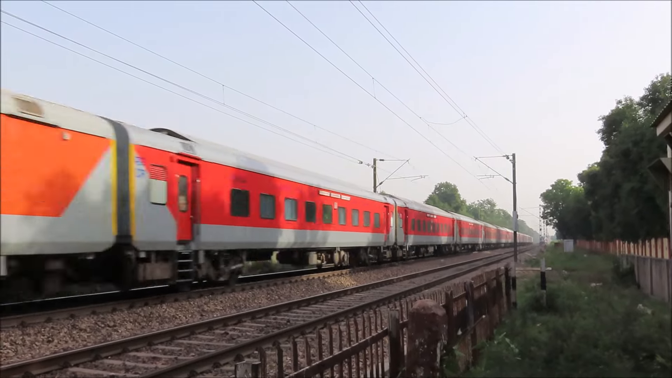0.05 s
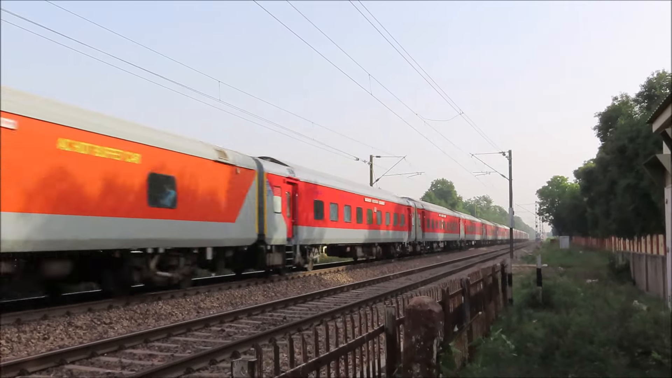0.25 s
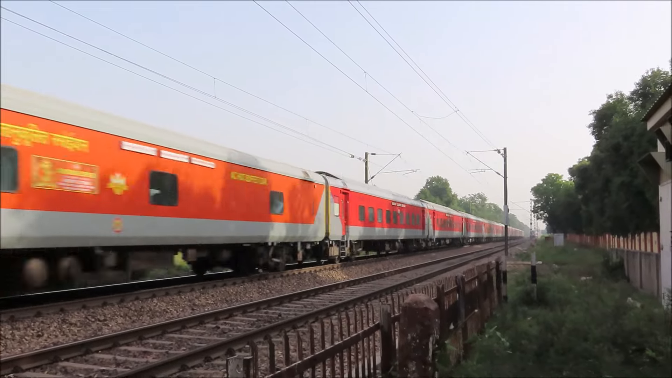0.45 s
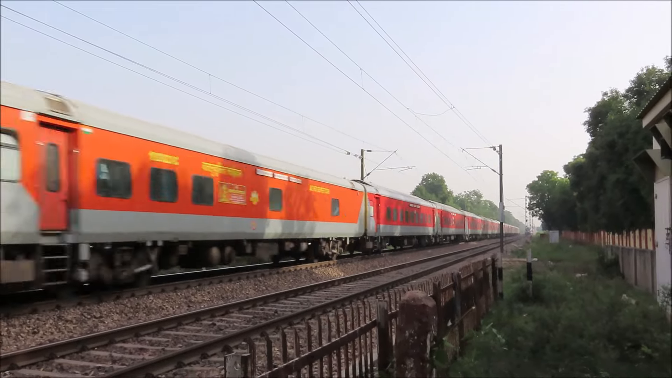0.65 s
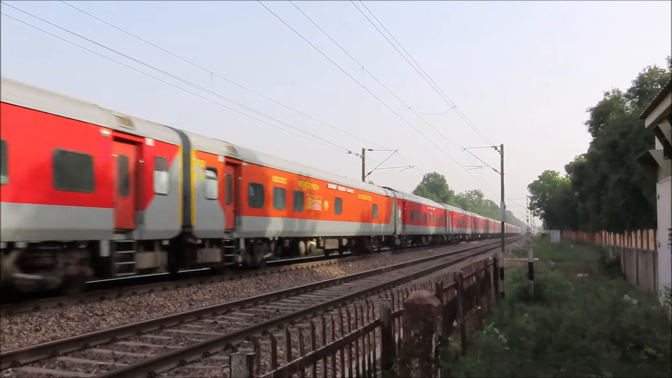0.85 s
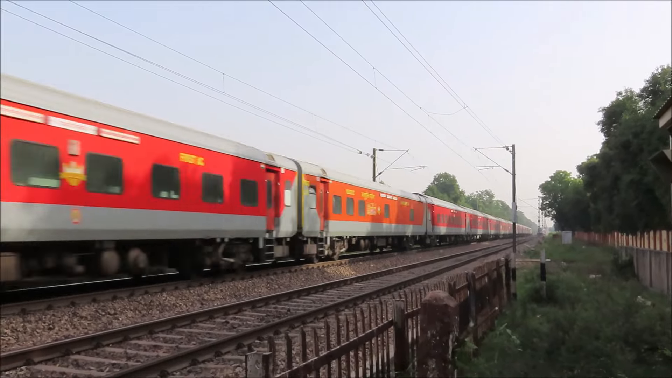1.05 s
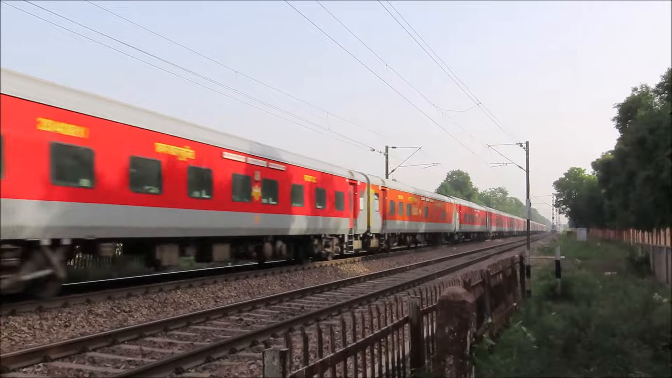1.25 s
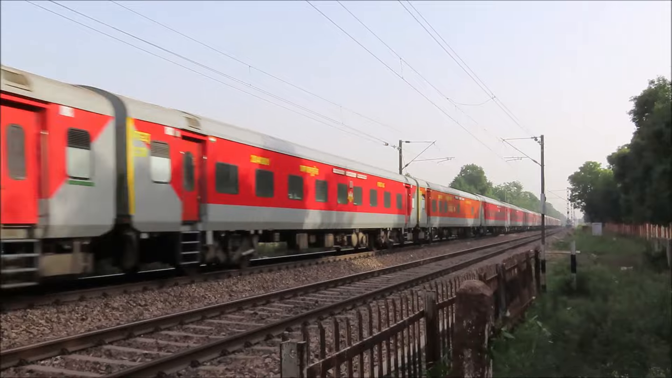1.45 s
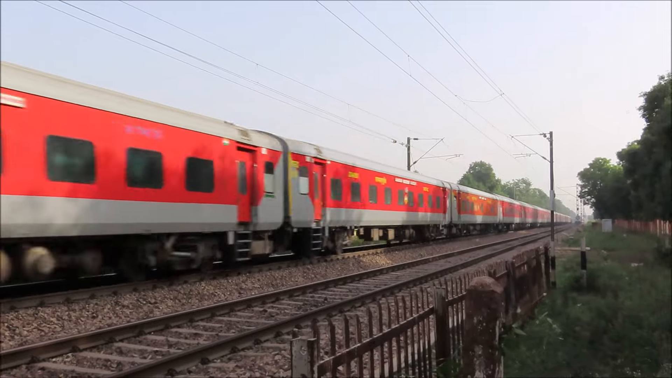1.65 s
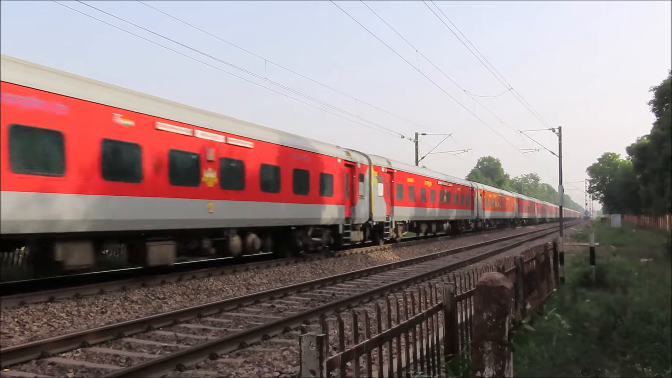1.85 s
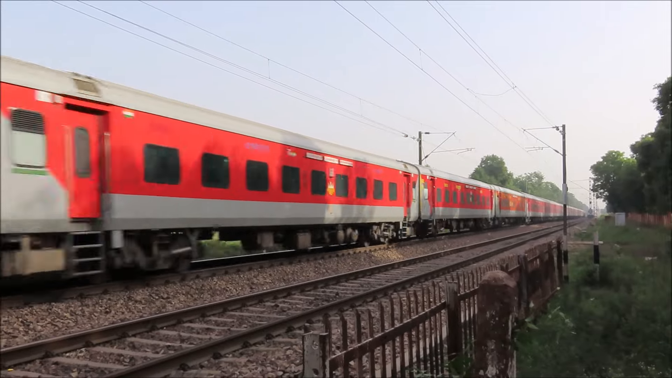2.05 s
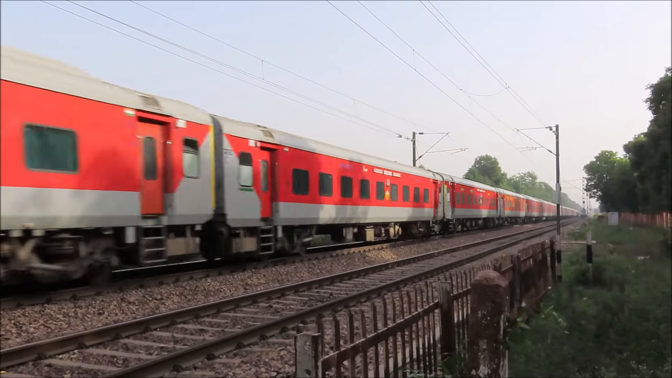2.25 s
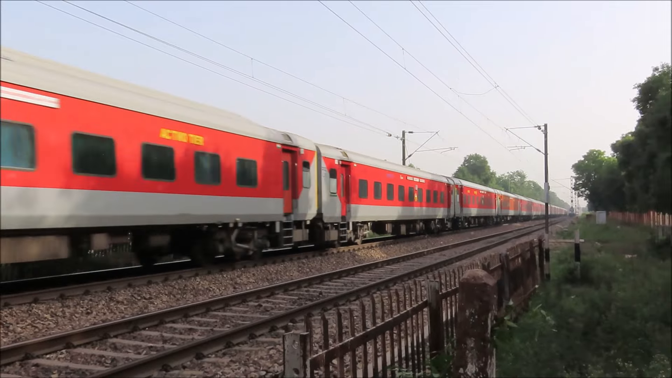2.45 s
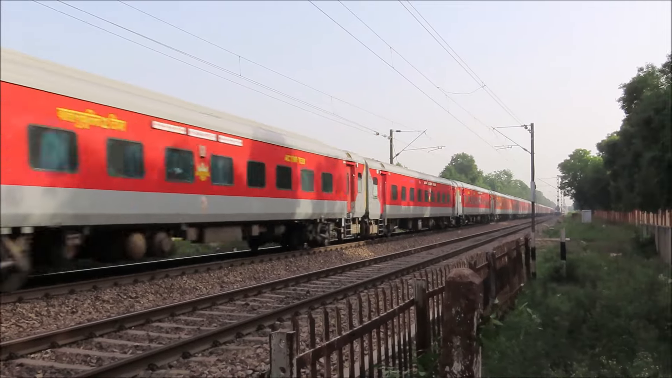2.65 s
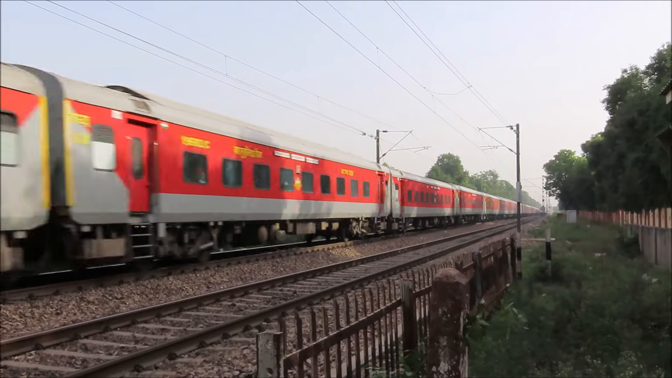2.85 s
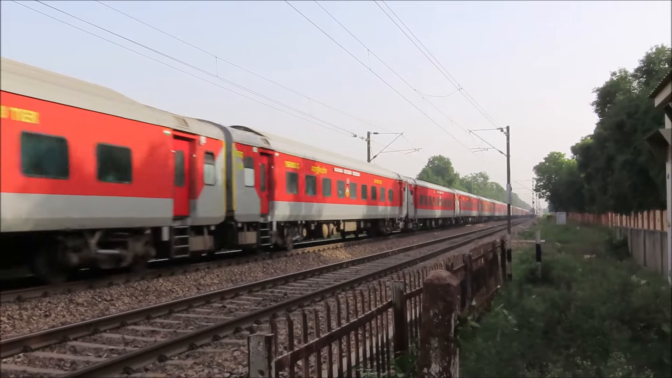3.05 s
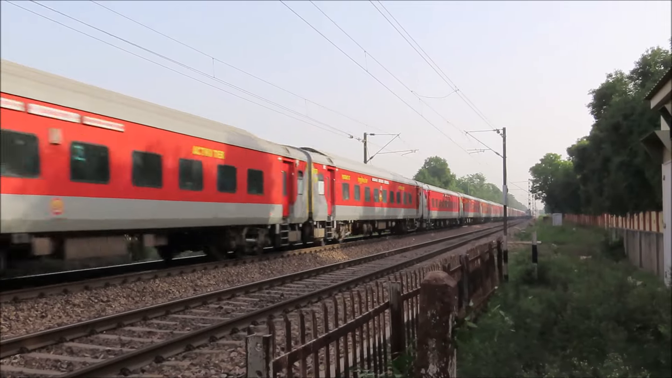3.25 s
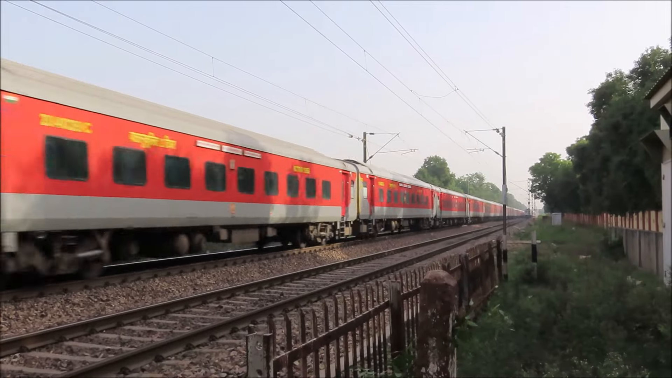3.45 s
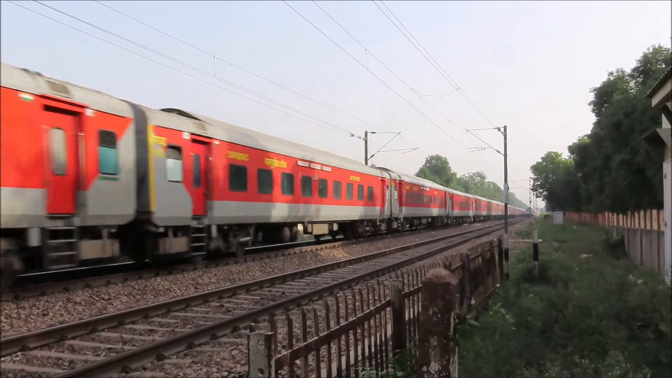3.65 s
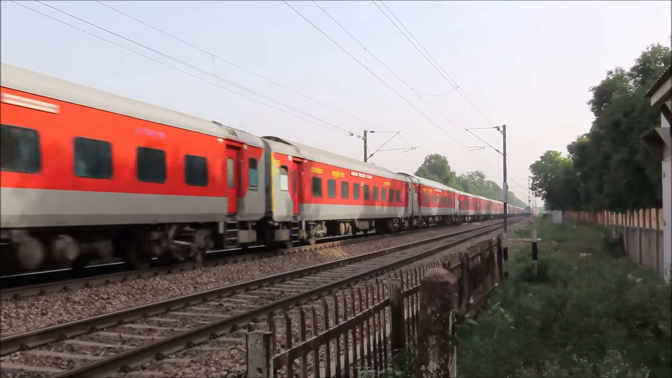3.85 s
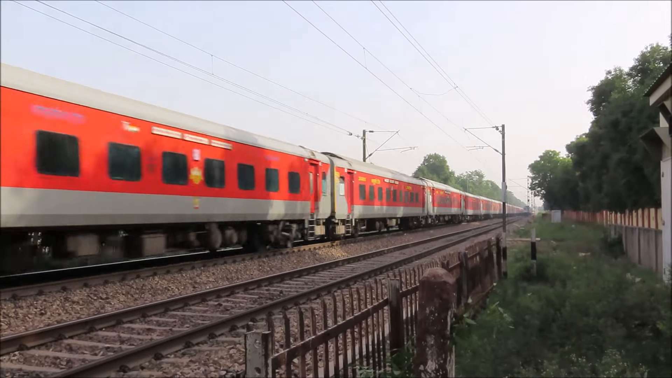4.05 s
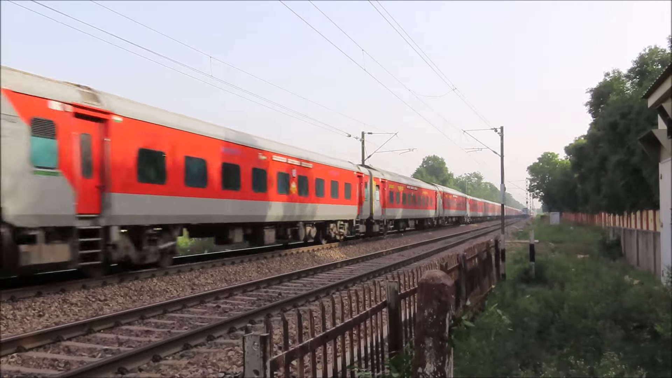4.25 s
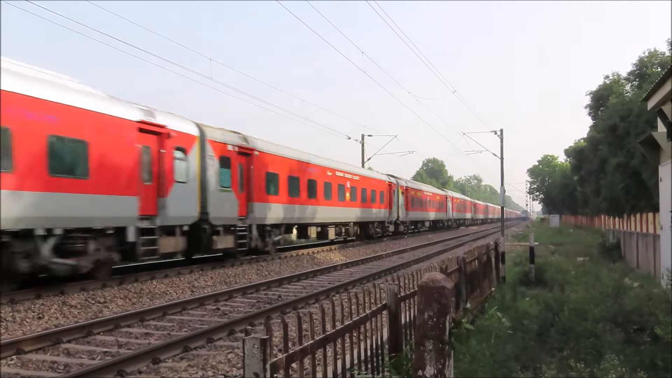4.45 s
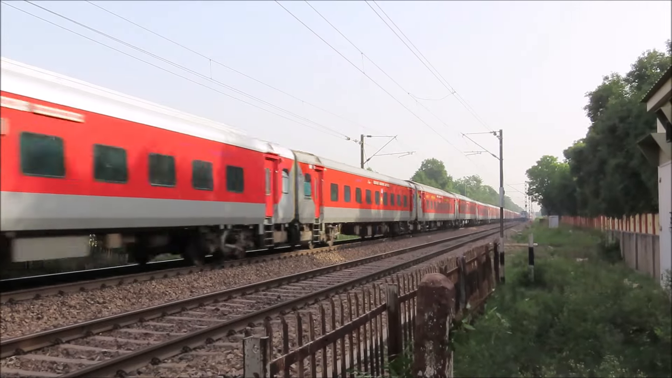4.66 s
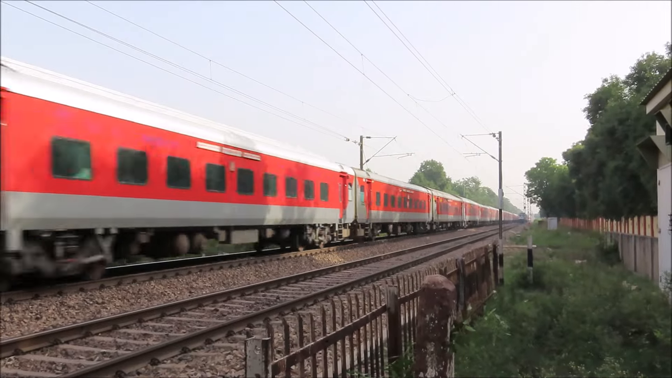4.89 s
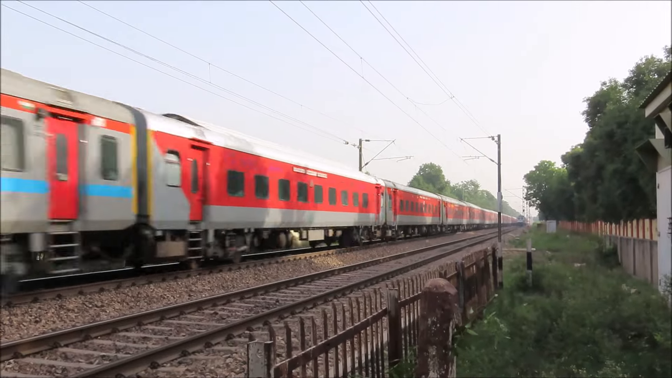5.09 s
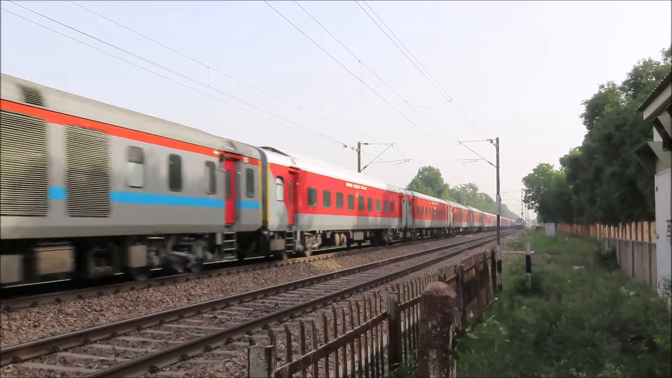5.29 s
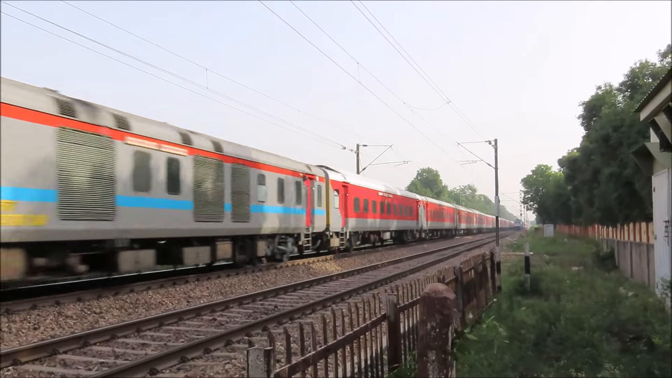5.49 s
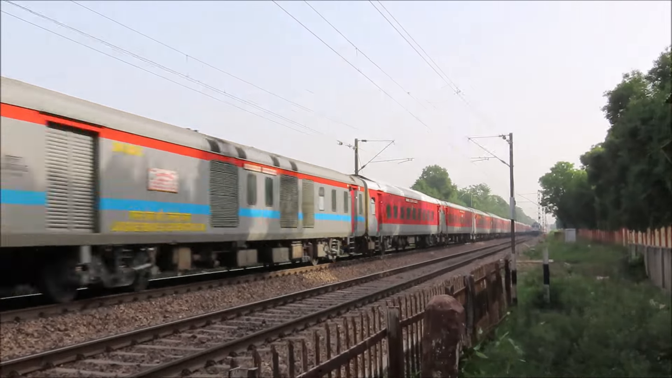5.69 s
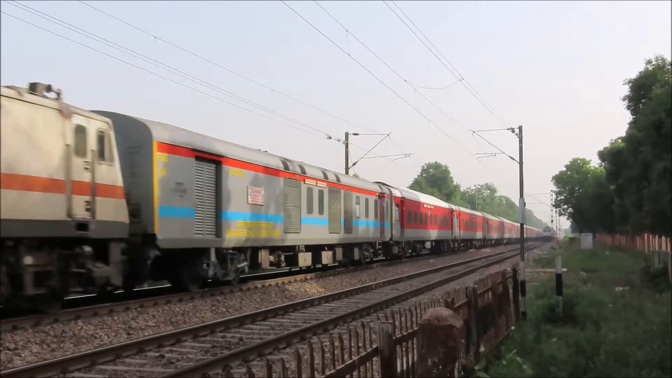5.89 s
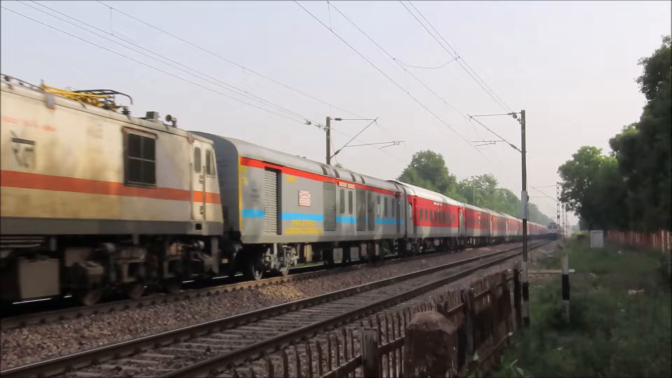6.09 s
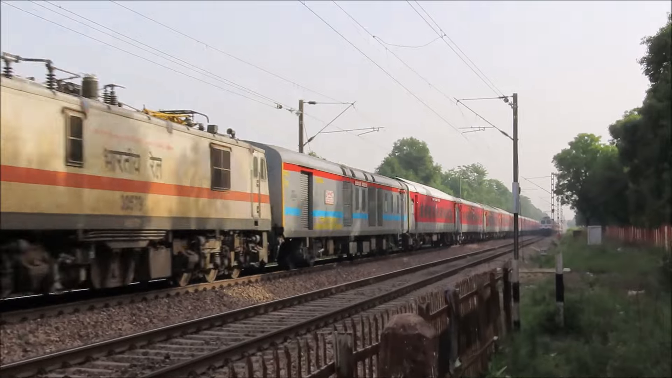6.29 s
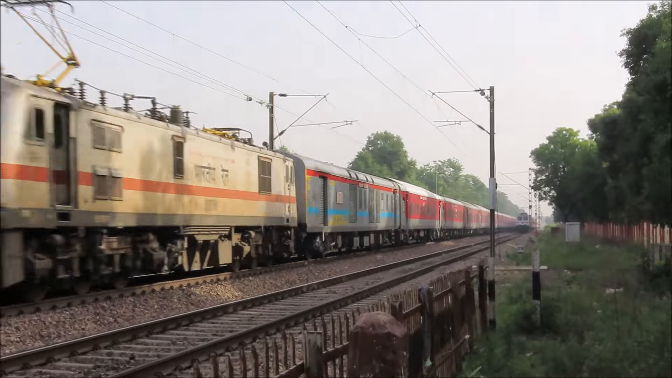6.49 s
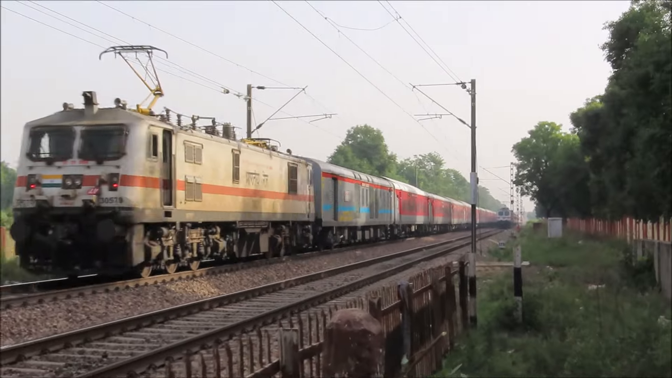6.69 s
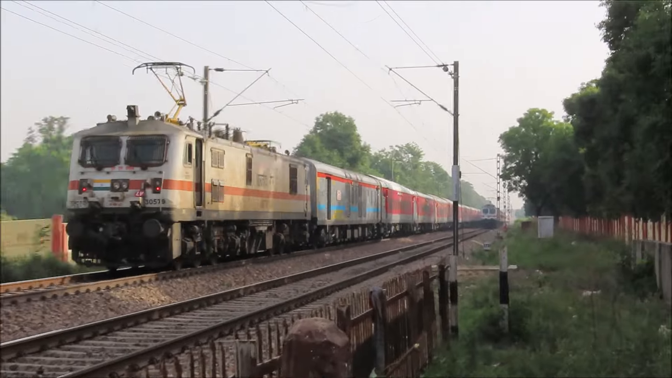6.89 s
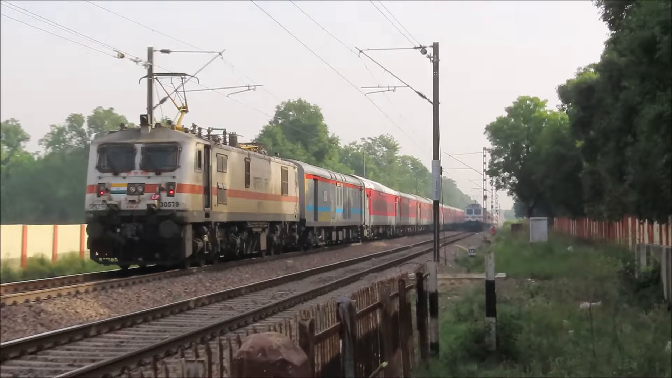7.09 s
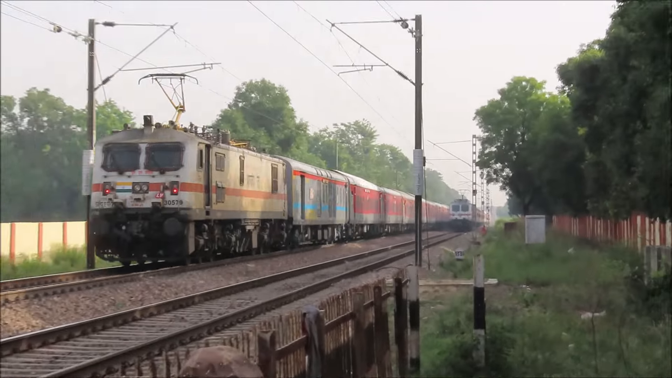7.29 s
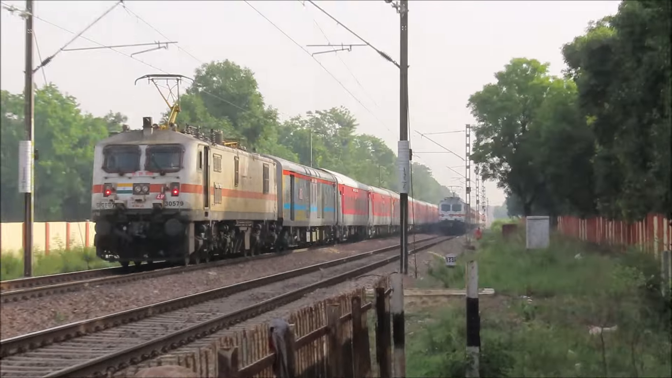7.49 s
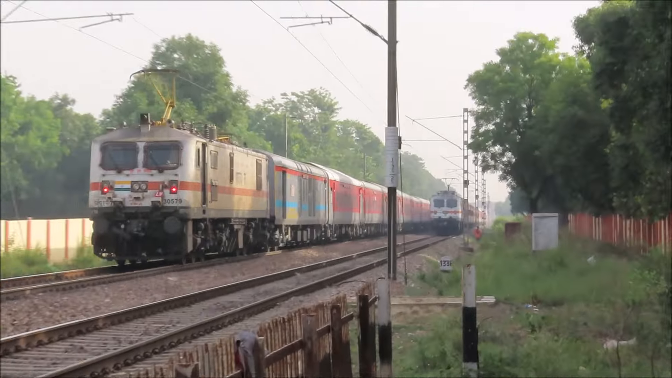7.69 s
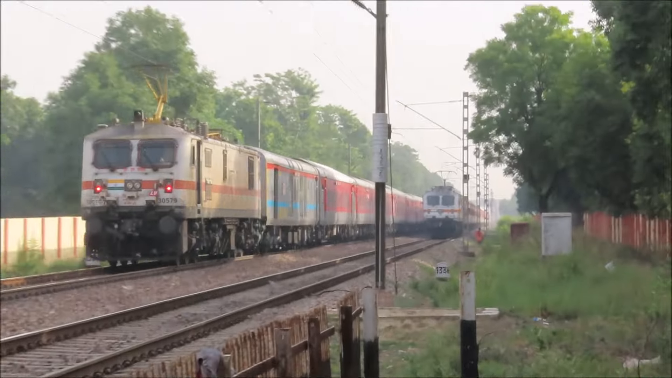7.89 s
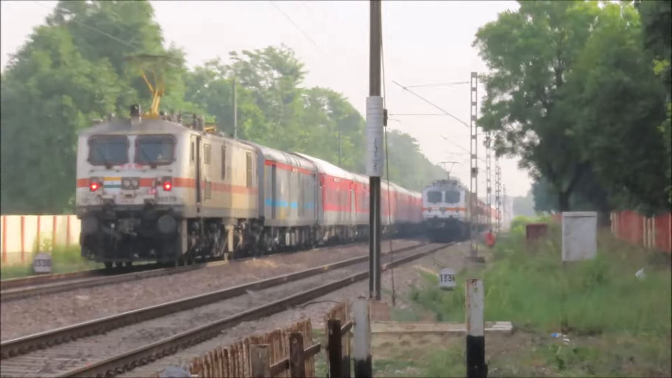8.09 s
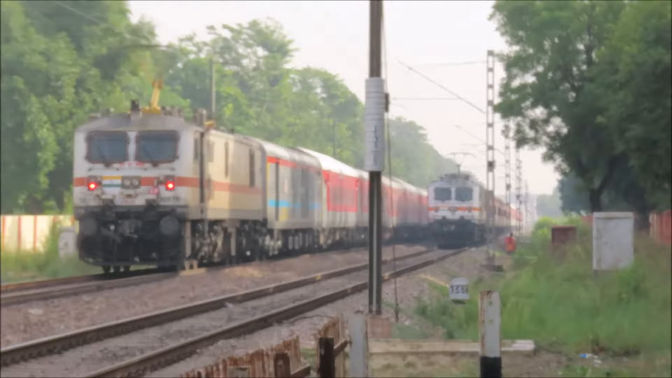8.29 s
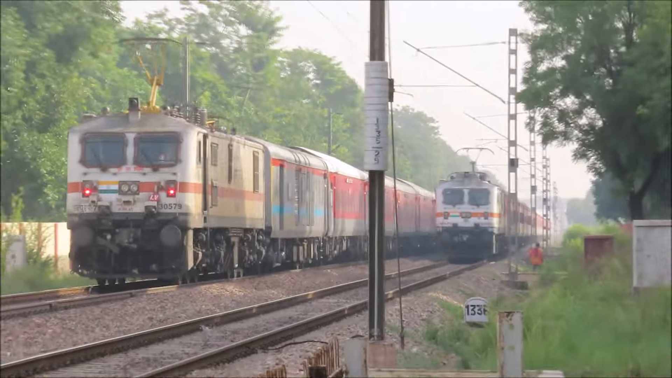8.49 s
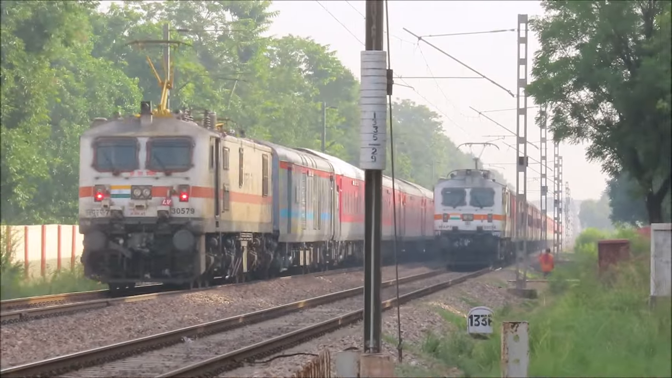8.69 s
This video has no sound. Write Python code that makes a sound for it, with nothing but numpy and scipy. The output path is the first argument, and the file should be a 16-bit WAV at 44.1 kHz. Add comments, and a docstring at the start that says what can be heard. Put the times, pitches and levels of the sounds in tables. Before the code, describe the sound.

From 0 s, coaches are already rushing past close on the left of a stereo microphone pair in the open beside the track. A broad rumble and rail hum swell with each bogie, roughly every 0.3 to 0.5 s, strongest around 0.0-0.7 s, with ringing wheel tones, rough clattering surges and brief wavering pitches. The passing continues through about 5.3 s, when the colour shifts slightly darker as the locomotive at the end arrives. Around 5.7-6.0 s it passes with a bright burst of hissing air and a faint, extremely high whine sliding down. From 6.1 to 6.7 s the roar falls away. Then thinner distant rails keep singing and fluttering in uneven bursts, while tiny dry ticks and faint bright rustle occur near the microphones, mainly 6.3-8.0 s. The distant rumble rises gradually until the end at about 8.7 s as another train nears.

```python
"""Beside the track, a microphone pair hears coaches rush past on the left: sleepers and bodies rumble and rails
hum as filtered noise swelling with each bogie, while wheels ring as resonant modes; the roar peaks briefly at
single pitches, as wavering tones. A trailing electric locomotive then hisses and whines abeam, as coloured
noise and a falling sine. As it leaves, small ticks and a faint rustle of bright noise sound close to the
microphones; the rails go on singing from afar, and the distant level climbs as the next train nears."""
import sys
import numpy as np
from scipy import signal
from scipy.fft import rfft, irfft, next_fast_len
from scipy.io import wavfile
from scipy.ndimage import uniform_filter1d

SR = 44100
rng = np.random.default_rng(int(sys.argv[2]) if len(sys.argv) > 2 else 0)


def nominal_scale(level):
    """Amplitude ratio for a level in decibels (scalar or array-like)."""
    x = np.asarray(level, float) / 20
    return 10 ** x


def store_wav(level_fs):
    """Save 16-bit WAV to argv[1]."""
    pcm = np.round(np.clip(np.atleast_2d(level_fs), -1, 1) * 32767)
    wavfile.write(sys.argv[1], SR, pcm.T.astype(np.int16))


N = 385434
T = np.arange(N) / SR
SIZE = next_fast_len(N + 8192)
HZ = np.fft.rfftfreq(SIZE, 1 / SR) + 1  # 1 Hz up, so that the log axis has no zero


def over_hz(table, column=1):
    """A table column read at every frequency, on a log axis."""
    rows = np.array(table, float)
    return np.interp(np.log(HZ), np.log(rows[:, 0]), rows[:, column])


def over_time(table):
    """The columns of a curve read at every sample."""
    s, *columns = np.transpose(table)
    return [np.interp(T, s, column) for column in columns]


def shape(x, gain):
    """Filter by a gain per frequency, with mirrored ends."""
    pad = 4096
    padded = np.pad(x, (pad, SIZE - N - pad), "reflect")
    return irfft(rfft(padded) * gain, SIZE)[pad:pad + N]


def unit(x):
    """Scaled to rms 1."""
    return x / np.sqrt(np.mean(x ** 2))


def coloured(table):
    """White noise filtered to a colour and scaled to rms 1."""
    return unit(shape(rng.standard_normal(N), nominal_scale(over_hz(table))))


def walk(rate):
    """Random levels held 1 / rate s and slewed twice; spread near 1."""
    k = int(SR / rate)
    held = np.repeat(rng.standard_normal(N // 200), k)
    return 1.3 * uniform_filter1d(uniform_filter1d(held, k), k)[:N]


# Each bogie as it draws abreast, by what it shakes.
# Each row: time in seconds, then ground, sleepers, rail and wheels levels in dB.
BOGIE_PASSES = [(.05, -37, -18.5, -23, -24.5), (.41, -34, -19.5, -22, -25), (.68, -37, -23, -25.5, -28.5),
                (1.15, -45, -25, -25.5, -27.5), (1.38, -43, -22.5, -28.5, -31),
                (1.8, -40, -27, -22.5, -29.5), (2.07, -40, -23, -23.5, -31.5),
                (2.5, -40, -20.5, -24, -31.5), (2.85, -41, -20, -22, -27), (3.29, -39, -26, -24.5, -26),
                (3.54, -35, -23.5, -29, -30.5), (3.97, -42, -25.5, -26.5, -29), (4.27, -39, -25, -26, -30),
                (4.72, -37, -22.5, -24, -28.5), (5.0, -33, -26.5, -28, -29.5),
                (5.37, -34, -19.5, -25.5, -34), (5.7, -30, -19, -26, -32), (6.1, -31, -38, -27, -32)]
# The next four lists run over the parts of the rolling noise: ground, sleepers, rail, wheels, air.
# Time from abreast at which a bogie's power is down to a quarter, in seconds.
BOGIE_REACH_S = [0.19, 0.32, 0.18, 0.16, 0.23]
# Steady part while the train is alongside, in dB.
ALONGSIDE_DB = [-41, -26, -28.5, -31.5, -39]
# Distant level until the first train has cleared, in dB, and at the end, as the next one nears, in dB.
AFAR_CLEARED_DB = [-38, -29.5, -34.5, -41, -46.5]
AFAR_ONCOMING_DB = [-33.5, -29, -33, -34.5, -44.5]


def loudness():
    """Level of each part: powers add as bogies swell and pass, one train leaves and another nears."""
    clears_s, clearing_s = 6.7, 0.6  # time at which the train has cleared, and how long that takes
    air_db = -9.5  # rush of air re the mean of rail and wheels
    s, ground, sleepers, rail, wheels = np.transpose(BOGIE_PASSES)
    peaks = [ground, sleepers, rail, wheels, (rail + wheels) / 2 + air_db]
    alongside = np.clip((clears_s - T) / clearing_s, 0, 1) ** 4
    levels = []
    for peak_db, reach, body_db, cleared_db, oncoming_db in zip(
            peaks, BOGIE_REACH_S, ALONGSIDE_DB, AFAR_CLEARED_DB, AFAR_ONCOMING_DB):
        bogies = sum(nominal_scale(2 * db) / (1 + ((T - at) / reach) ** 2) ** 2 for at, db in zip(s, peak_db))
        afar_db = np.interp(T, [clears_s, T[-1]], [cleared_db, oncoming_db])
        levels.append(np.sqrt(bogies + alongside * nominal_scale(2 * body_db) + nominal_scale(2 * afar_db)))
    return levels


# Rough spots on the rail, where the clatter surges with sharp edges, and smooth ones where it lulls.
# Each row: start in seconds, end in seconds, then changes of the rail in dB, of the wheels in dB, and
# of the ringing modes in dB on top of the wheels.
ROUGH_SPOTS = [(0.35, 0.464, 0, 0, -1), (0.61, 0.743, 0, 2.5, -1), (1.712, 1.92, -0.7, -0.5, 3.5),
               (2.127, 2.172, -1, 4.5, 4), (2.252, 2.417, -2, -1.5, 1), (2.436, 2.508, 2.5, 1, 5),
               (3.2, 3.36, 1, -0.5, 0.5), (3.68, 3.825, -0.5, -1.5, 2.5), (4.364, 4.45, -.6, 1, 0),
               (5.338, 5.43, -0.5, 2.2, -4), (6.174, 6.254, -2, 0, 4), (6.49, 6.68, 2, 2, 0),
               (7.02, 7.093, 1.5, 2, 4), (7.193, 7.4, 3, 1.5, -5), (7.508, 7.602, 5.5, 0, 3.5),
               (7.6, 7.746, 4.5, 2.5, -9), (8.015, 8.077, 5.5, -0.5, -2)]


def surges():
    """Changes in dB of rail, wheels and modes over time; rough and smooth spots act at once."""
    changes = []
    for column in (2, 3, 4):
        steps = sum(1. * row[column] * ((T > row[0]) & (T < row[1])) for row in ROUGH_SPOTS)
        changes.append(uniform_filter1d(steps, size=260))  # edges of about 6 ms
    return changes


# Borders between the ranges of ground, sleepers, rail, wheels and air, in Hz.
RANGE_BORDERS_HZ = [95, 420, 1250, 2700]


def rolling(colour, levels):
    """Roughness of wheel and rail shakes each part of the track in its own range."""
    noise = rfft(rng.standard_normal(SIZE)) * nominal_scale(over_hz(colour))
    below = [0] + [1 / (1 + (HZ / f) ** 8) for f in RANGE_BORDERS_HZ] + [1]
    parts = [irfft(noise * (hi - lo), SIZE)[:N] for lo, hi in zip(below, below[1:])]
    return sum(unit(part) * level for part, level in zip(parts, levels))


def singing(modes, patchy_db):
    """Lightly damped modes shaken by one roughness; the strength of each wanders by itself."""
    song, roughness = 0, rng.standard_normal(N)
    for hz, width, db in modes:
        peak = signal.iirpeak(hz, hz / width, SR)
        mode = signal.lfilter(*peak, signal.lfilter(*peak, roughness))
        song = song + nominal_scale(db + patchy_db * walk(16)) * unit(mode)
    return song


# The roar peaks briefly at one pitch.
# Each row: centre in seconds, pitch in Hz, level in dB before the wavering, spread in seconds.
BRIEF_PEAKS = [(0.03, 2140, -20, 0.03), (0.4, 178.4, -10, 0.021), (0.42, 2150, -20, 0.042),
               (0.42, 3600, -31, 0.044), (0.68, 175, -16, 0.045), (0.699, 1480, -22.5, 0.035),
               (0.67, 2090, -27, 0.045), (0.705, 3230, -28, 0.036), (0.7, 3540, -36, 0.03),
               (1.19, 870, -16.5, 0.04), (1.652, 172, -21, 0.045), (1.74, 1870, -26, 0.022),
               (1.79, 2350, -26.5, 0.028), (1.81, 2810, -29, 0.012), (1.88, 3330, -35, 0.025),
               (1.92, 1015, -18, 0.028), (2.11, 938, -18.5, 0.024), (2.14, 2160, -20, 0.023),
               (2.161, 1746, -22, 0.045), (2.158, 4360, -33, 0.014), (2.161, 2980, -33, 0.015),
               (2.161, 5470, -46, 0.02), (2.72, 71, -30, 0.05), (2.89, 2080, -24, 0.029),
               (3.218, 84.5, -23, 0.04), (3.248, 387, -28, 0.063), (3.36, 2120, -25, 0.035),
               (3.958, 2680, -25, 0.02), (4.27, 2560, -36, 0.016), (5.712, 284, -17, 0.035),
               (5.85, 48, -24, 0.074), (5.86, 240.6, -16.5, 0.046), (6.129, 240.3, -21.5, 0.087),
               (6.409, 343, -26.5, 0.04), (6.421, 89, -27, 0.034), (6.94, 111.6, -27.5, 0.065),
               (7.25, 108, -29, 0.054), (7.28, 667, -32, 0.05), (7.4, 98.9, -29, 0.055),
               (7.61, 623, -22, 0.021), (7.631, 80, -21, 0.03), (7.71, 660, -26, 0.019),
               (7.99, 88, -25, 0.026), (8.04, 958, -31, 0.046), (8.182, 1658, -35, 0.023),
               (8.39, 87, -21.5, 0.024), (8.57, 2120, -33, 0.027)]


def roar_peaks():
    """Each peak swells and fades, wavering in pitch and strength like narrow noise."""
    wobble = 0.045  # sets the wavering rate, in proportion to the pitch
    out = np.zeros(N)
    t = np.arange(-9000, 9000) / SR
    for s, hz, db, spread in BRIEF_PEAKS:
        k = int(SR / hz / wobble / 2)
        a, b = (unit(uniform_filter1d(uniform_filter1d(rng.standard_normal(len(t)), k), k))
                for _ in range(2))
        tone = np.real((0.6 + 0.5 * (a + 1j * b)) * np.exp(2j * np.pi * hz * t))
        swell = nominal_scale(db) * np.exp(-0.5 * (t / spread) ** 2)
        at = int(s * SR) + np.arange(len(t)) - len(t) // 2
        inside = (at >= 0) & (at < N)
        out[at[inside]] += (swell * tone)[inside]
    return out


# How the side follows the mid for a source on the left of the pair.
# Each row: frequency in Hz, share 0-1 for a source alongside, phase lead in radians.
LEFT_AIM = [(100, 0, 0.24), (600, 0.8, 0.084), (1300, 0.7, 0.25), (2500, 0.57, 1), (4900, .5, 1.22),
            (10000, 0.3, 1.4)]


def side_signal(direct, along, wide, aim):
    """Part of the side is the mid itself, led in phase; the rest comes from along the train."""
    alike = np.clip(aim * over_hz(LEFT_AIM), 0, 1)
    lead = np.exp(1j * over_hz(LEFT_AIM, column=2))
    gain = nominal_scale(over_hz(wide))
    return shape(direct, gain * np.sqrt(alike) * lead) + shape(along, gain * np.sqrt(1 - alike))


# Shares of coach and locomotive colour; some coach colour stays under the distant rails.
# Each row: time in seconds, coach colour share 0-1, locomotive colour share 0-1; far colour fills the rest.
COLOUR_SHARES = [(0, 0.93, 0), (5.2, 1, 0), (5.45, 0.26, 0.73), (6.1, 0, 0.84), (6.25, 0.02, 0.48),
                 (6.45, 0.35, 0)]
# Rolling colour of the coaches, of the locomotive and from afar; each range is scaled to its own level.
# Each row: frequency in Hz, relative density in dB per Hz.
COACH_COLOUR = [(15, -52), (25, -35), (43, -22), (91, -14), (169, 1), (231, -2), (306, -9.5), (440, -11),
                (569, -12), (906, -6), (1340, -15), (1480, -12), (2130, -17), (8360, -55), (12000, -87.5),
                (15600, -101), (22000, -120)]
ENGINE_COLOUR = [(15, -51), (25, -29), (38, -27), (115, -7), (231, -3.5), (323, -12), (463, -11),
                 (541, -14.5), (631, -7), (930, -8), (1240, -13.5), (2130, -19.5), (3850, -33), (7740, -53),
                 (12000, -82), (15600, -102), (22000, -120)]
FAR_COLOUR = [(15, -31), (25, -12), (92, -2), (130, -9), (214, -11), (300, -21.5), (456, -18), (641, -10.5),
              (760, -19), (1480, -19.5), (2200, -24), (2350, -29.5), (3250, -34.5), (9250, -57),
              (13000, -69)]
# Side over mid of the finished sound, alongside and from afar.
# Each row: frequency in Hz, ratio in dB.
NEAR_WIDTH = [(60, -44), (110, -39), (200, -30), (370, -22), (690, -16.5), (1260, -12.5), (2320, -8),
              (4270, -6.5), (6000, 1.5), (7860, 1.5), (10000, 16), (12500, 34), (14400, 14)]
FAR_WIDTH = [(60, -51), (200, -60), (370, -29), (450, -21), (700, -49), (1100, -18.5), (1450, -33),
             (2300, -93), (3500, -36), (5000, -25), (8000, -44), (11000, -2), (14400, 11)]
# Modes of the wheels alongside and of the rails from afar.
# Each row: frequency in Hz, width in Hz of each of two filters in a row, mean level in dB re wheels.
WHEEL_MODES = [(692, 67, -14), (790, 140, -13.5), (932, 89, -11), (1062, 98, -14.5), (1456, 23, -15),
               (1616, 32, -14), (1774, 78, -15.5), (1880, 27, -18), (2120, 71, -14), (2347, 57, -22.5),
               (2640, 44, -24), (2980, 33, -26), (3250, 100, -23), (3600, 100, -29), (3930, 83, -25),
               (4216, 77, -26.5), (4620, 97, -27), (5620, 150, -33), (8100, 140, -40)]
RAIL_MODES = [(643, 29, -5.5), (930, 60, -13), (1295, 29, -4.5), (1666, 25, -5), (2160, 21, -13),
              (2950, 55, -41)]


def trains():
    """Mid and side of coaches, locomotive and far track: rolling noise, singing modes and roar peaks."""
    coaches, engine = np.clip(over_time(COLOUR_SHARES), 0, 1)
    far = np.clip(1 - coaches - engine, 0, 1)
    # the parts flicker together slightly at random, the ground least
    flicker = walk(24)
    depths_db = [0.1, 0.35, 0.64, 0.37, 0.65]
    levels = [part * nominal_scale(depth * flicker) for part, depth in zip(loudness(), depths_db)]
    rail_db, wheels_db, modes_db = surges()
    air_surge = 1.1  # the rush of air surges this many times as far in dB as the wheels
    surging = [rail_db, wheels_db, air_surge * wheels_db]
    levels[2:] = [level * nominal_scale(db) for level, db in zip(levels[2:], surging)]
    struck = levels[3] * nominal_scale(modes_db)
    peaks = roar_peaks()
    wheels = struck * singing(WHEEL_MODES, patchy_db=4)
    rails = struck * singing(RAIL_MODES, patchy_db=-0.5)
    # colour, song, width, share over time, factor on the share of side that follows the mid
    sources = [(COACH_COLOUR, wheels, NEAR_WIDTH, coaches, 1),
               (ENGINE_COLOUR, 1.1 * wheels, NEAR_WIDTH, engine, 1),
               (FAR_COLOUR, rails, FAR_WIDTH, far, 0.12)]
    mid, side = 0, 0
    for colour, song, wide, share, aim in sources:
        direct = np.sqrt(share) * (rolling(colour, levels) + song) + share * peaks
        # the farther wheels send the same song 1500 samples (34 ms) later
        along = np.sqrt(share) * (rolling(colour, levels) + np.roll(song, 1500))
        mid = mid + direct
        side = side + side_signal(direct, along, wide, aim)
    return mid, side


# Locomotive air jet. Each row: time in seconds, level in dB, gain of the mid in dB as it moves ahead.
AIR_JET = [(5.5, -55.5, 7.5), (5.62, -47, 3), (5.68, -39, 1), (5.75, -39, -1), (5.8, -34.5, 0),
           (5.86, -31.5, -2), (5.92, -31.5, 0), (5.98, -38, 3), (6.04, -47, 7), (6.2, -63, 0),
           (6.4, -78, -4)]
# Its colour. Each row: frequency in Hz, relative level in dB.
JET_COLOUR = [(2000, -17), (4000, -2), (6000, 0), (8800, 0), (12300, 1.5), (13700, -6), (14900, 6),
              (15600, -15)]
# Its mid. Each row: frequency in Hz, gain in dB.
JET_MID_GAIN = [(2000, 8), (5000, 1.5), (8000, -5), (12000, -15), (15000, -16)]
# The whine drops as it goes by.
# Each row: time in seconds, mean pitch in Hz, amplitude in dB.
FALLING_WHINE = [(5.8, 14100, -32), (5.84, 14100, -38), (5.88, 13800, -26), (5.92, 13800, -37),
                 (5.97, 13200, -58)]


def locomotive():
    """A hiss and a falling whine from abeam, where the pair hears the treble mostly as side."""
    jet_db, ahead_db = over_time(AIR_JET)
    side, other = (nominal_scale(jet_db + 0.81 * walk(30)) * coloured(JET_COLOUR) for _ in range(2))
    mid = shape(nominal_scale(ahead_db) * other, nominal_scale(over_hz(JET_MID_GAIN)))
    hz, whine_db = over_time(FALLING_WHINE)
    sounding = (T > FALLING_WHINE[0][0]) & (T < FALLING_WHINE[-1][0])
    phase = 2 * np.pi * np.cumsum(hz + 40 * walk(150)) / SR  # pitch wavers by about 40 Hz
    whine = nominal_scale(whine_db) * sounding * np.sin(phase)
    return mid, side + whine


# Ticks near the microphones.
# Each row: start in seconds, side level at the start in dB, time to fall by 60 dB in seconds.
CLOSE_TICKS = [(6.287, -50, .02), (6.487, -42, .03), (6.5, -44, .14), (6.85, -49, .02), (6.86, -48, .04),
               (6.928, -50, .02), (6.937, -50, .03), (7.109, -50, .04), (7.155, -52, .04), (7.209, -51, .3),
               (7.38, -54, .1), (7.46, -53, .1), (7.521, -49, .05), (7.575, -53, .04), (7.73, -56, .04),
               (7.895, -58, .03), (7.962, -56, .04), (8.01, -56, .03)]
# Faint rustle near the microphones. Each row: time in seconds, mean side level in dB.
CLOSE_RUSTLE = [(6., -88), (6.3, -57), (6.6, -51), (6.75, -62), (7.05, -59), (7.25, -65), (7.45, -61),
                (7.68, -58), (7.76, -66), (8., -77), (8.74, -73)]
# Colour of both. Each row: frequency in Hz, relative level in dB.
TICK_COLOUR = [(5500, -17), (7000, 10), (8500, 0), (10500, 0), (12500, 1), (14500, 0), (15800, -18)]


def ticks():
    """Short bright scratches of noise that die away exponentially, over a faint rustle."""
    envelope = sum(nominal_scale(db - 60 * (T - s).clip(0) / t60) * (T >= s) for s, db, t60 in CLOSE_TICKS)
    envelope = envelope + nominal_scale(over_time(CLOSE_RUSTLE)[0] + 3 * walk(25))
    side, mid = (envelope * coloured(TICK_COLOUR) for _ in range(2))
    return nominal_scale(-8) * mid, side


def scene():
    """Left and right, from mid and side."""
    mid, side = np.sum([trains(), locomotive(), ticks()], axis=0)
    return np.array([mid + side, mid - side])


def roll_off(x):
    """The treble ends steeply here."""
    return signal.sosfilt(signal.butter(12, 15050, fs=SR, output="sos"), x)


def record(dry):
    """The finished stereo mix, passed through the last stage."""
    return roll_off(dry)


dry = scene()
out = record(dry)
store_wav(out)
```